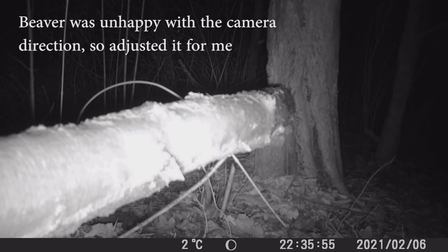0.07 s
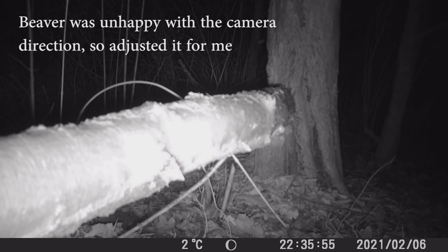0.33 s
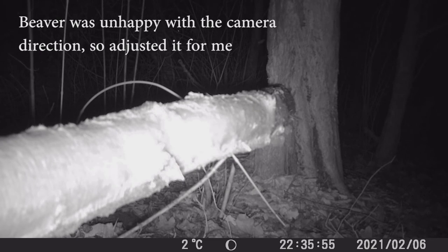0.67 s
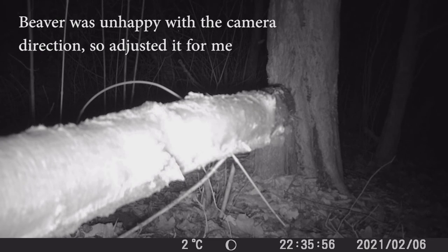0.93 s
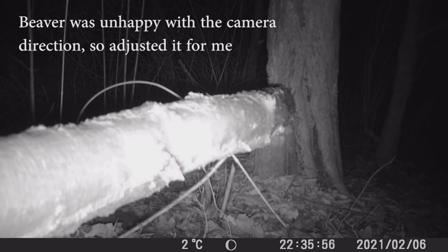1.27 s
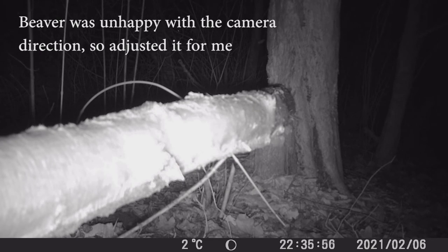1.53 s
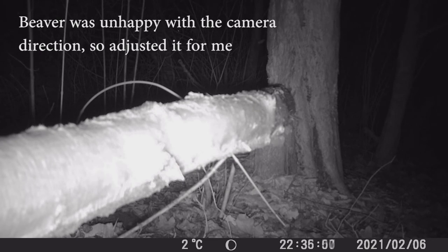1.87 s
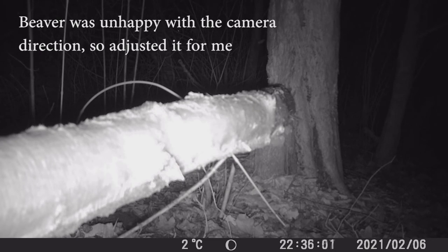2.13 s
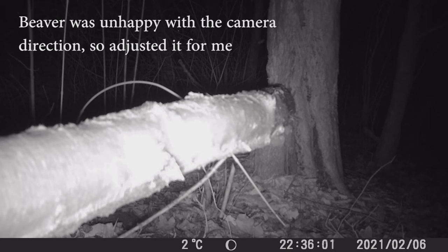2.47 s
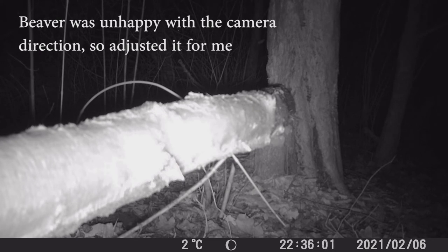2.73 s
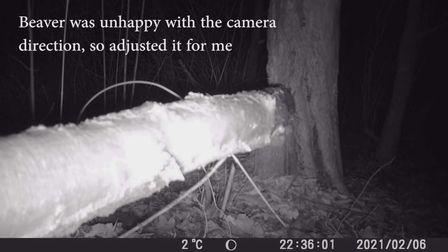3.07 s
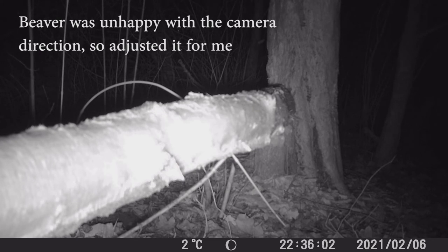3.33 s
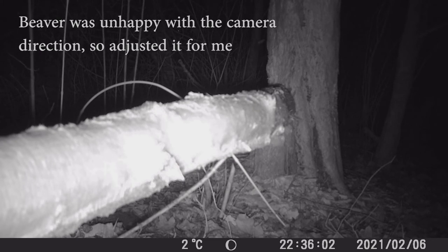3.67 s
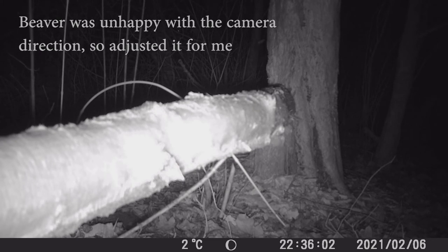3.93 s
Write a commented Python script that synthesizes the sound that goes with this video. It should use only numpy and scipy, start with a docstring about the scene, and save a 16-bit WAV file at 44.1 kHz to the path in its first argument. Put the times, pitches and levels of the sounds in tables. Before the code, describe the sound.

Wind buffets the microphone in woodland as something briefly brushes and clicks against its housing.

```python
"""Wind buffeting the microphone of a trail camera, out in woodland at night.
The rumble slowly gathers over an even wash of distant water and microphone hiss. Right at the
microphone, something brushes the plastic housing: it ticks, lets go with a click and a hollow knock,
and rustles faintly on. The camera's own electronics whine and chirp very softly throughout."""
import sys
import numpy as np
from scipy import signal
from scipy.fft import rfft, irfft
from scipy.io import wavfile
from scipy.ndimage import uniform_filter1d

SR = 44100
rng = np.random.default_rng(int(sys.argv[2]) if len(sys.argv) > 2 else 0)


def materialize(psi):
    """Save the field psi as 16-bit PCM at rate SR to the path in sys.argv[1].

    A 1-D psi becomes a single channel; in a 2-D psi each row is a channel.
    """
    bounded = np.clip(np.atleast_2d(psi).T, -1, 1)
    quanta = np.round(bounded * 32767).astype(np.int16)
    wavfile.write(sys.argv[1], SR, quanta)


N = 176400
T = np.arange(N) / SR

# gusts on the microphone: time_s, relative_db
GUST_LEVELS = [(0.0, -43), (0.15, -43), (0.2, -35), (0.3, -46), (0.4, -32), (0.54, -43), (0.6, -29),
               (0.66, -44), (0.79, -33), (0.88, -45), (0.99, -36), (1.15, -43), (1.18, -35), (1.31, -46),
               (1.36, -31), (1.51, -42), (1.53, -35), (1.7, -41), (1.74, -32), (1.81, -41), (2.34, -31),
               (2.38, -43), (2.41, -35), (2.74, -30), (2.76, -41), (2.79, -32), (2.95, -37), (3.21, -28),
               (3.26, -36), (3.42, -36), (3.44, -43), (3.56, -33), (3.62, -38), (3.65, -26), (3.72, -24),
               (3.79, -41), (3.83, -28), (3.95, -30)]
# rumble of the gusts: frequency_hz, relative_db
GUST_SPECTRUM = [(8,-22.5),(20,0.5),(33,-4.5),(44,-3.5),(58,-10.5),(80,-27.5),(105,-33.5),(140,-48.5),(250,-57),(600,-97.5)]
# strength of the deep buffeting: time_s, level_db
BUFFET_LEVELS = [(0,-35.5),(1.1,-38),(1.4,-30.5),(1.8,-38),(2.1,-28.5),(2.8,-31),(3.55,-30.5),(3.8,-27.5),(3.93,-14.5)]
# colour of the deep buffeting: frequency_hz, relative_db
BUFFET_SPECTRUM = [(3,-3),(9,-1.5),(16,-0.5),(22,-10),(36,-31),(80,-91)]
# distant water and microphone hiss: frequency_hz, relative_db
WASH_SPECTRUM = [(30,11.5),(65,14.5),(90,15),(120,5),(150,-0.5),(200,-2),(290,-2),(440,-8.5),(540,-15),(640,-24),(760,-17),(950,-12),(1300,-13),(2200,-15.5),(3200,-19),(4600,-26),(6600,-24.5),(7800,-26),(8900,-33.5),(9700,-44),(10400,-54)]
# hard brush against the housing: time_s, level_db
BRUSH_LEVELS = [(.22,-78),(.28,-65),(.335,-61.5),(.392,-52.5),(.408,-62),(.438,-60),(.444,-46),(.476,-45),(.505,-50),(.535,-63.5),(.58,-65),(.61,-78)]
# faint rustles afterwards: middle_s, half_length_s, level_db
RUSTLE_SWELLS = [(0.775,0.023,-62.5),(0.862,0.061,-60),(1.28,0.23,-65),(1.677,0.21,-68)]
# rubbing, heard through the housing: frequency_hz, relative_db
RUB_SPECTRUM = [(200,-40),(620,-32),(780,-19),(900,-4),(990,0.5),(1060,-4),(1150,-5.5),(1350,-14),(1480,-7),(1700,-18),(2200,-15),(2900,-22.5),(4200,-26.5),(5000,-26.5),(6500,-29),(7300,-24.5),(8000,-29),(8800,-31.5),(9300,-39),(10400,-53)]
# sharp ticks on the housing: start_s, level_db
TICK_HITS = [(0.357,-44),(0.359,-47),(0.3706,-40.5),(0.6116,-34),(0.6107,-34),(0.614,-51),(.7525,-53),(.8720,-56),(.9833,-52)]
# bright modes that a tick rings: pitch_hz, relative_db, t60_s
BRIGHT_MODES = [(2420,-20,.01),(3795,-17.5,0.016),(5200,-7.5,0.007),(5660,-4.5,0.0047),(7260,1.5,0.0074),(8620,-5.5,0.0061)]
# catches and knocks on the housing: start_s, lowest_mode_db, upper_modes_db
KNOCK_HITS = [(0.444,-60,-35),(0.458,-70,-40),(0.472,-71,-39),(0.498,-47,-61),(0.6123,-38,-38)]
# hollow modes of the housing and its mount: pitch_hz, relative_db, t60_s, rise_s, sag_fraction
HOLLOW_MODES = [(284,2.5,0.15,0.0029,0.35),(963,-13,.026,0.0032,0),(1004,-12,0.049,0.0018,0),(1187,3,0.022,0.0017,0.15)]
# patches of snagging in the rub: middle_s, half_length_s, level_db
SNAG_SWELLS = [(.485,0.039,-55.5),(.92,0.074,-63)]


def amp(db):
    """Decibels to gain."""
    return 10 ** (np.asarray(db) / 20)


def unit(x):
    """Scales to rms 1."""
    return x / np.sqrt(np.mean(x ** 2) + 1e-20)


def level(points):
    """Gain over time from rows of time_s, level_db."""
    return amp(np.interp(T, *np.transpose(points)))


def swells(rows):
    """Gain over time of bell-shaped swells from rows of middle_s, half_length_s, level_db."""
    return sum(amp(db) * np.exp(-np.minimum(((T - middle) / half) ** 2, 20)) for middle, half, db in rows)


def colour(x, spectrum):
    """Filters x by a spectrum and scales it to rms 1."""
    octave = np.log2(np.fft.rfftfreq(N, 1 / SR) + 1)
    hz, db = np.transpose(spectrum)
    gain = amp(np.interp(octave, np.log2(hz), db))
    return unit(irfft(rfft(x) * gain, N))


def eddies(spectrum):
    """Turbulent noise of the given colour, held at an even strength."""
    noise = colour(rng.standard_normal(N), spectrum)
    power = uniform_filter1d(uniform_filter1d(noise ** 2, size=3500), size=2500)
    return noise / np.sqrt(power)


def wind(gust_gain_db=1):
    """Low turbulence right on the microphone bumps and drops, over slow, deep pressure swings."""
    gusts = amp(gust_gain_db) * eddies(GUST_SPECTRUM) * level(GUST_LEVELS)
    buffeting = eddies(BUFFET_SPECTRUM) * level(BUFFET_LEVELS)
    return gusts + buffeting


def wash(level_db=-48, patch_db=0.85):
    """Water far off and the microphone's own hiss: even noise with slight drifting patches."""
    spectrogram = signal.stft(rng.standard_normal(N), nperseg=512)[2]
    patches = uniform_filter1d(rng.standard_normal(spectrogram.shape), size=7, axis=0)  # across pitch
    patches = unit(uniform_filter1d(patches, size=12, axis=1))  # across time
    hiss = signal.istft(spectrogram * amp(patch_db * patches))[1][:N]
    return amp(level_db) * colour(hiss, WASH_SPECTRUM)


def whine(pitch_hz=6530, rms_db=-86):
    """The camera's electronics hold one thin, steady tone."""
    return amp(rms_db) * np.sqrt(2) * np.sin(2 * np.pi * pitch_hz * T)


def chirps(pitch_hz=5380, level_db=-67.5, half_length_s=0.0035):
    """The electronics give a faint, wavering double chirp five times a second."""
    first_s, every_s, pair_gap_s, jitter_s = 0.172, 0.1996, 0.028, 0.002
    times = first_s + every_s * np.arange(20) + jitter_s * rng.standard_normal(20)
    gate = swells([(time + lag, half_length_s, level_db) for time in times for lag in (0, pair_gap_s)])
    waver_hz = 110 * unit(uniform_filter1d(rng.standard_normal(N), size=60))
    return gate * np.sin(2 * np.pi * np.cumsum(pitch_hz + waver_hz) / SR)


def friction(slips_per_s=3900, spread_db=3.5):
    """Dense tiny slips of uneven size, coloured by the housing."""
    slips = (rng.random(N) < slips_per_s / SR) * rng.choice([-1, 1], N)
    sizes = amp(spread_db * np.minimum(rng.exponential(1, N), 4))
    return colour(slips * sizes, RUB_SPECTRUM)


def rustle():
    """Something rubs the housing, right at the microphone: one hard brush, then a few soft strokes."""
    touching = (T > BRUSH_LEVELS[0][0]) & (T < BRUSH_LEVELS[-1][0])
    brush = friction() * level(BRUSH_LEVELS) * touching
    strokes = friction() * swells(RUSTLE_SWELLS)
    return brush + strokes


def ring(start, hz, db, t60, rise, sag=0, settle_s=0.0076):
    """One housing mode builds and dies away; contact flattens its pitch by the fraction sag at first."""
    age = np.maximum(T - start, 0)
    settled = 1 - np.exp(-np.minimum(age / settle_s, 20))
    cycles = hz * (age - sag * settle_s * settled)
    attack = 1 - np.exp(-np.minimum((age / rise) ** 2, 20))
    decay = np.exp(-np.log(1000) * np.minimum(age / t60, 10))
    return amp(db) * attack * decay * np.sin(2 * np.pi * cycles)


def tick(start_s, level_db, rise_s=0.00055):
    """A sharp contact rings the bright, short modes of the plastic."""
    return sum(ring(start_s, hz, level_db + mode_db, t60, rise_s) for hz, mode_db, t60 in BRIGHT_MODES)


def crackle(snags_per_s=350, spread_db=3.5):
    """Sparse little snags in the rubbing, each a tiny tick of the housing."""
    snags = rng.random(N) < snags_per_s / SR
    sizes = amp(spread_db * np.minimum(rng.exponential(1, N), 2))
    return signal.fftconvolve(snags * sizes * swells(SNAG_SWELLS), tick(start_s=0, level_db=0))[:N]


def knock(start_s, lowest_mode_db, upper_modes_db):
    """The housing and mount ring hollow: soft bumps drive the lowest mode, catches the upper ones."""
    sound = np.zeros(N)
    for index, (hz, mode_db, t60, rise, sag) in enumerate(HOLLOW_MODES):
        drive_db = lowest_mode_db if index == 0 else upper_modes_db
        sound += ring(start_s, hz, mode_db + drive_db, t60, rise, sag)
    return sound


def scene():
    """Everything as it reaches the one microphone inside the camera."""
    ticks = sum(tick(*hit) for hit in TICK_HITS)
    knocks = sum(knock(*hit) for hit in KNOCK_HITS)
    return (wind() + wash() + rustle() + crackle() + ticks + knocks + whine() + chirps())[None]


def record(dry):
    """The camera's recorder cuts the top treble off steeply."""
    edge_hz = 10400
    lowpass = signal.firwin(511, edge_hz, window=("kaiser", 9), fs=SR)
    return signal.oaconvolve(dry, lowpass[None], "same")


dry = scene()
out = record(dry)
materialize(out)
```